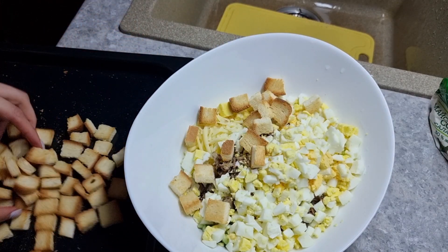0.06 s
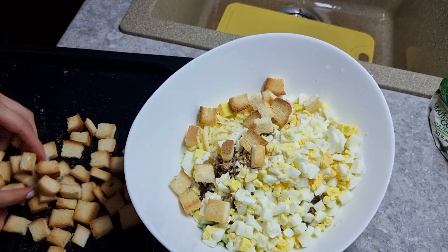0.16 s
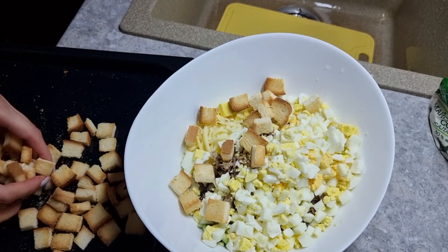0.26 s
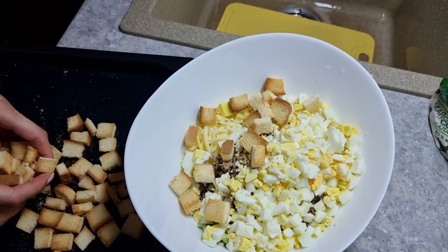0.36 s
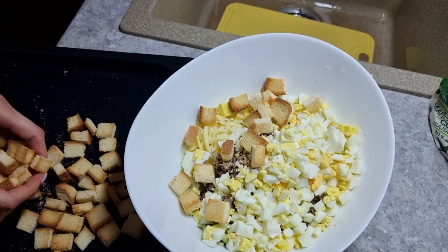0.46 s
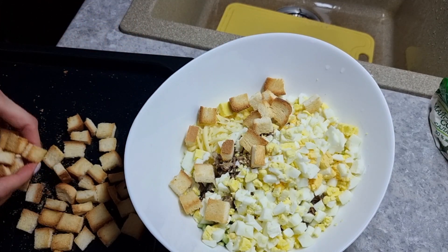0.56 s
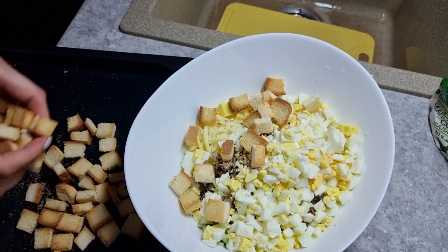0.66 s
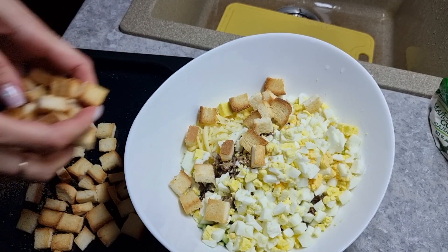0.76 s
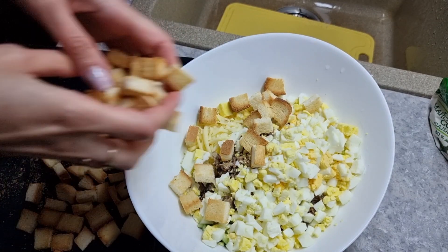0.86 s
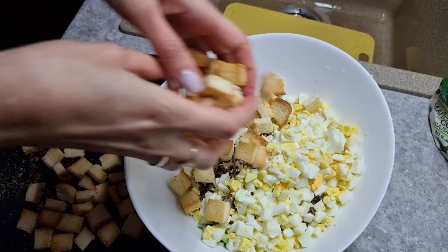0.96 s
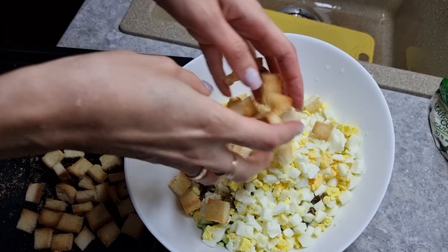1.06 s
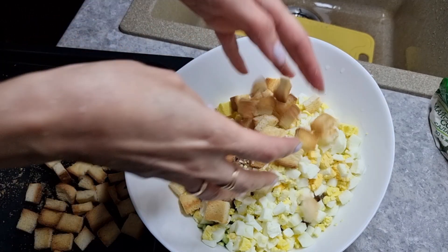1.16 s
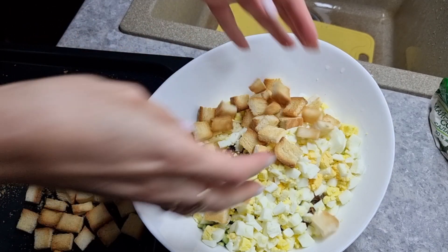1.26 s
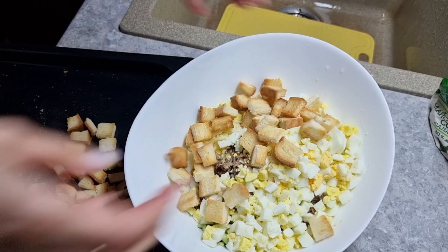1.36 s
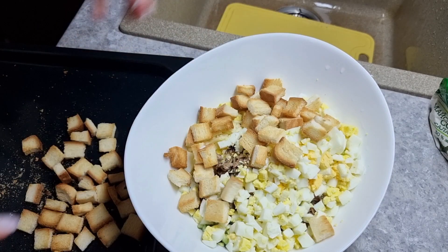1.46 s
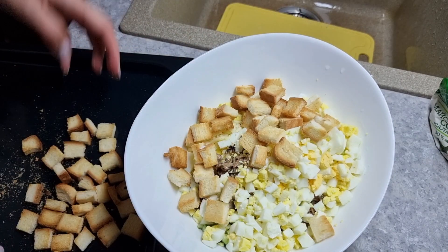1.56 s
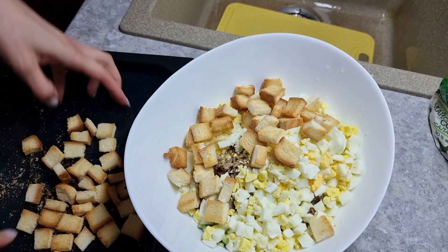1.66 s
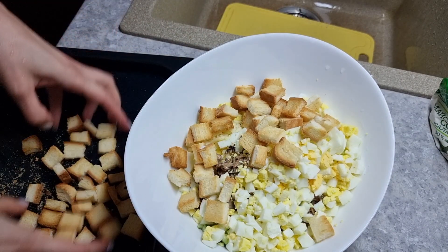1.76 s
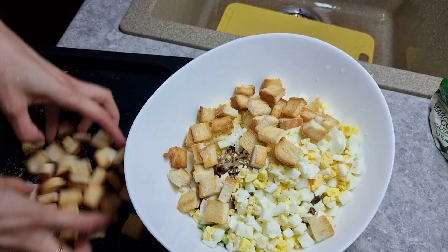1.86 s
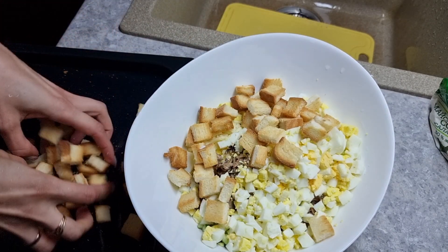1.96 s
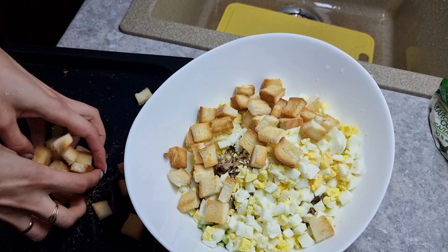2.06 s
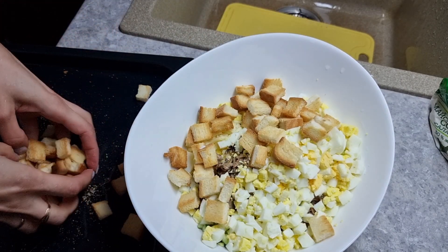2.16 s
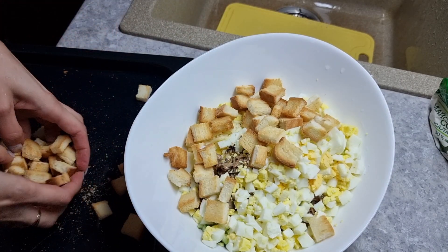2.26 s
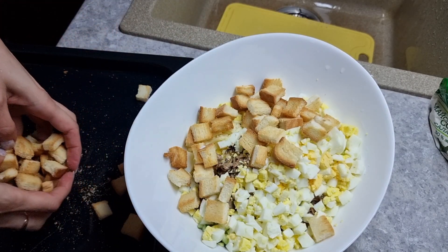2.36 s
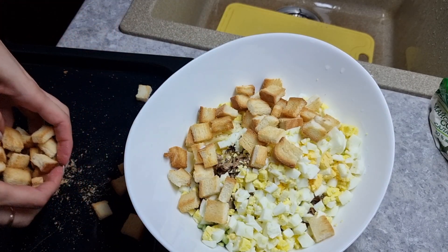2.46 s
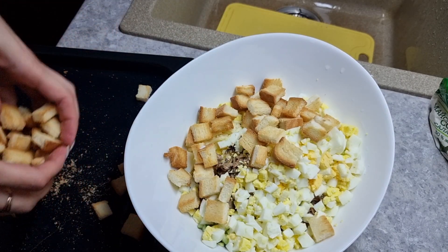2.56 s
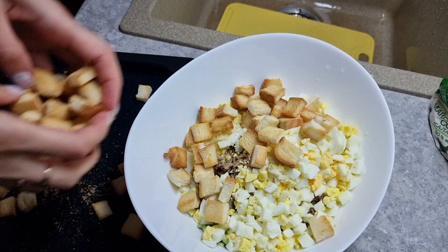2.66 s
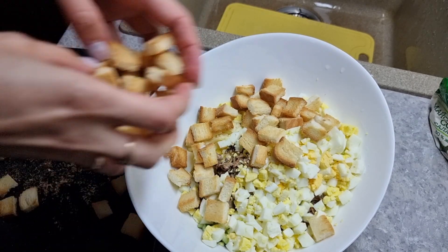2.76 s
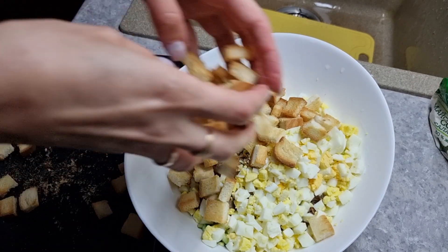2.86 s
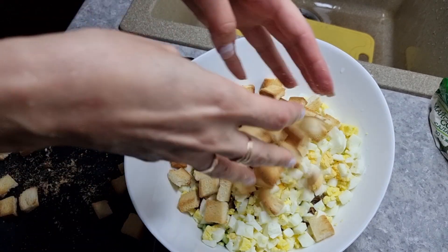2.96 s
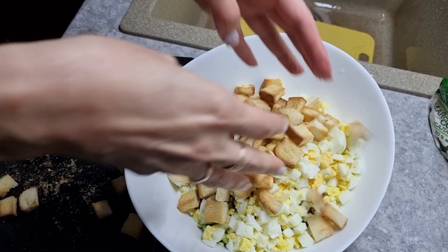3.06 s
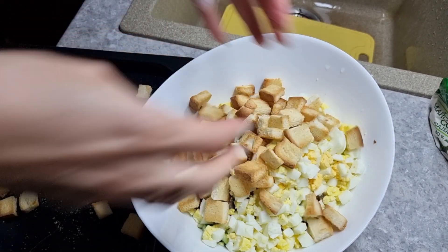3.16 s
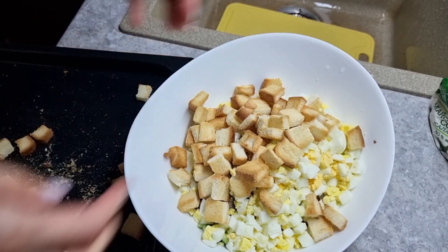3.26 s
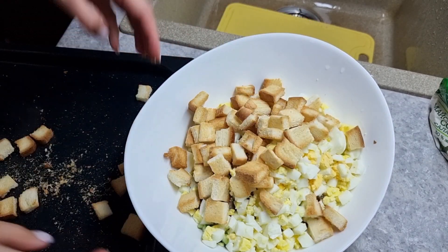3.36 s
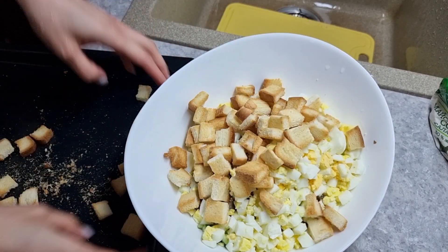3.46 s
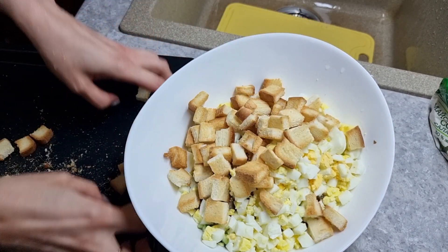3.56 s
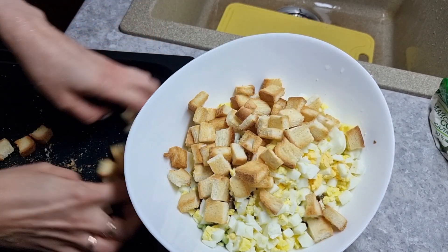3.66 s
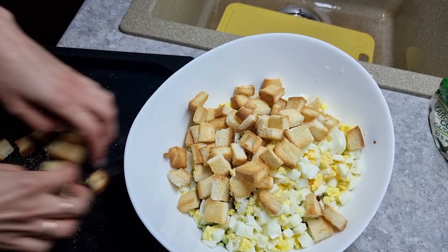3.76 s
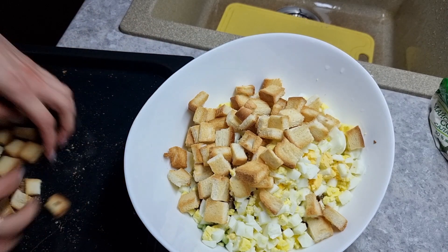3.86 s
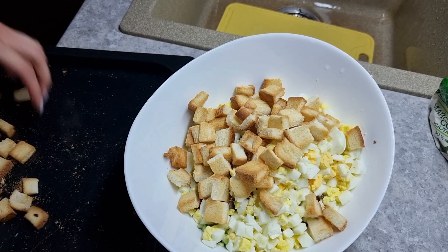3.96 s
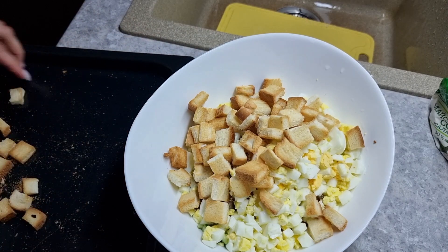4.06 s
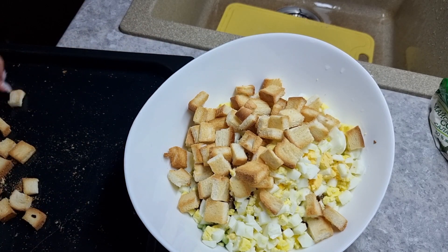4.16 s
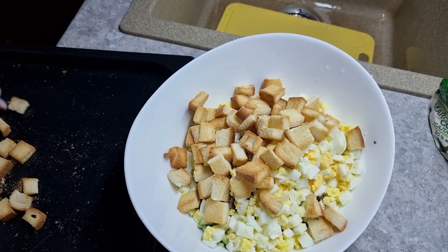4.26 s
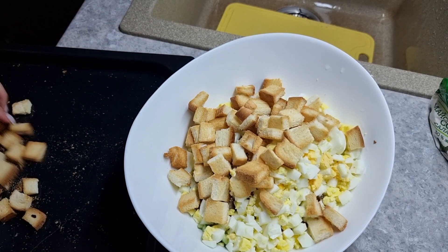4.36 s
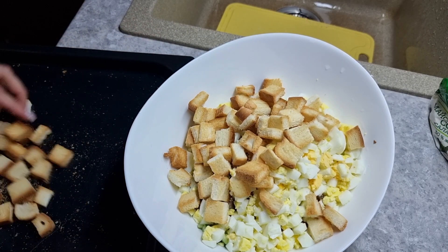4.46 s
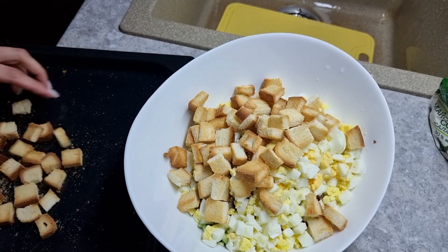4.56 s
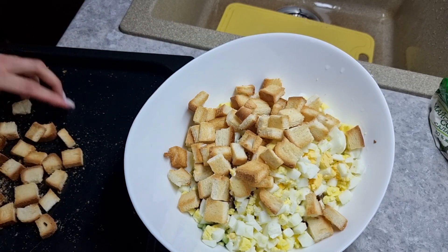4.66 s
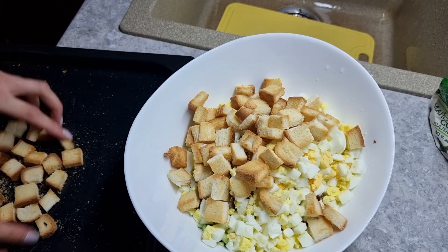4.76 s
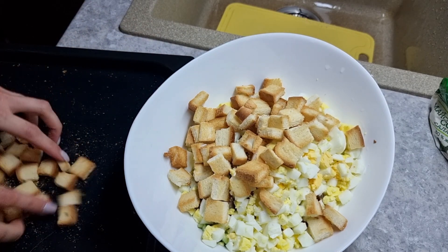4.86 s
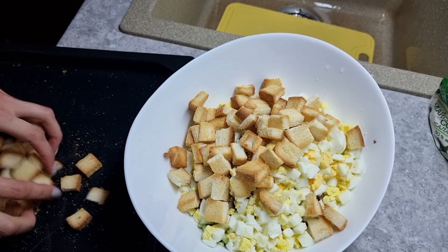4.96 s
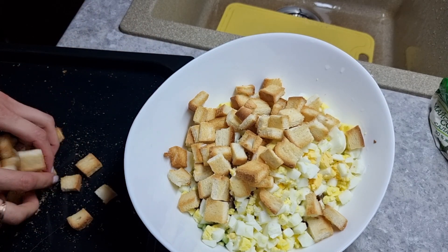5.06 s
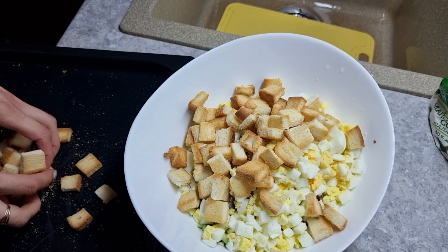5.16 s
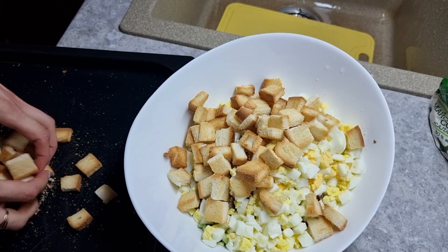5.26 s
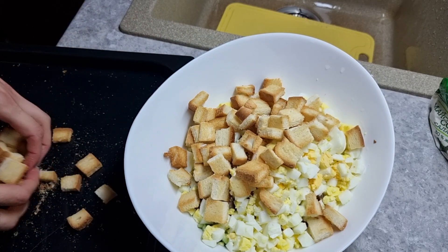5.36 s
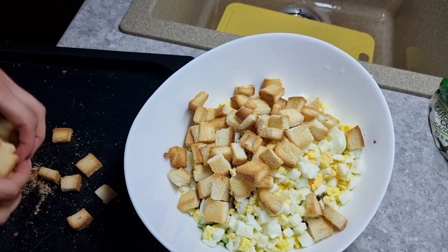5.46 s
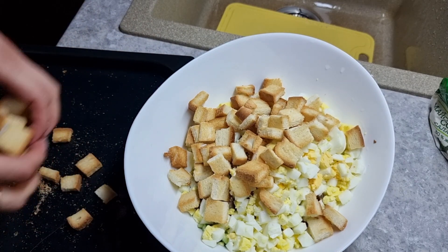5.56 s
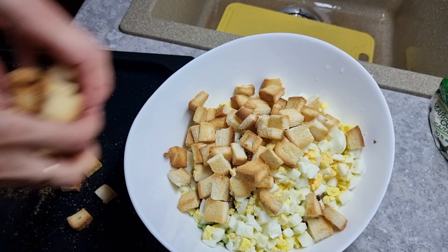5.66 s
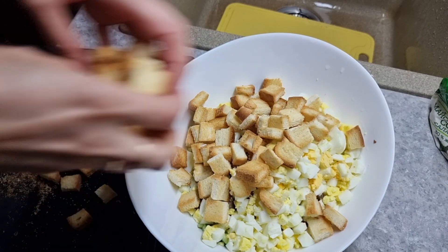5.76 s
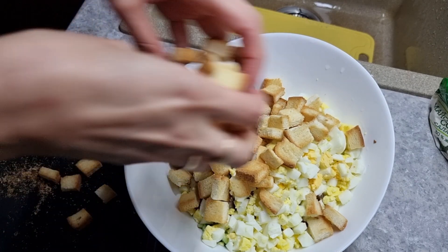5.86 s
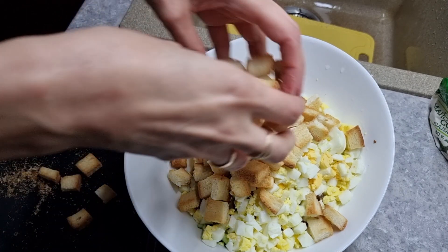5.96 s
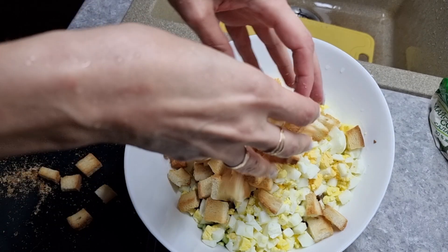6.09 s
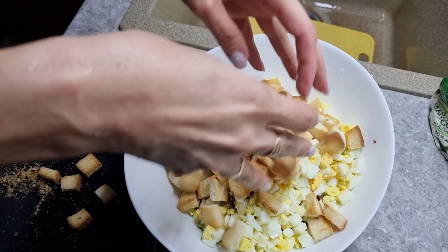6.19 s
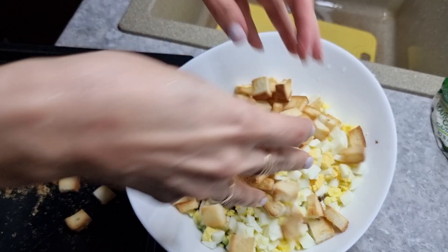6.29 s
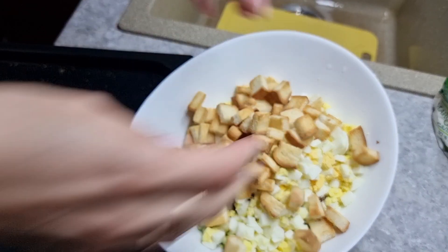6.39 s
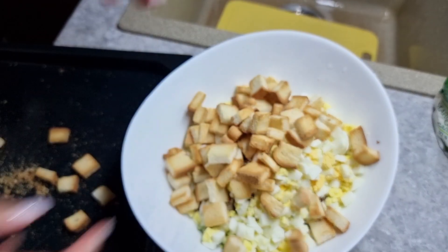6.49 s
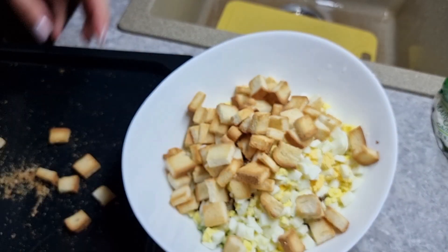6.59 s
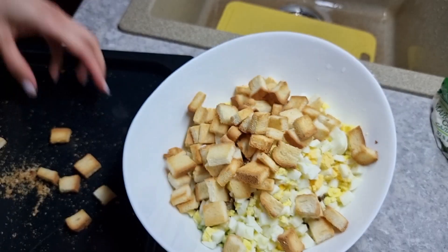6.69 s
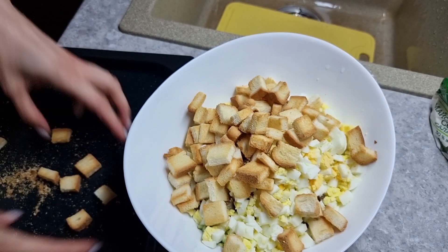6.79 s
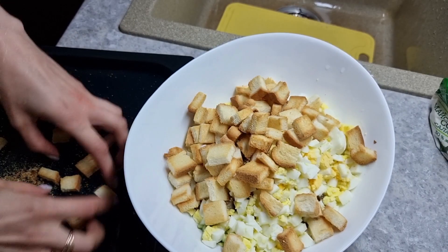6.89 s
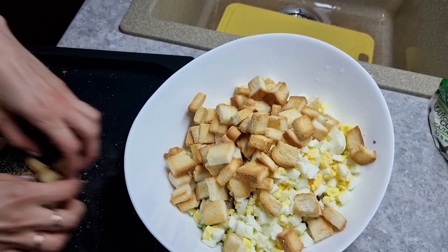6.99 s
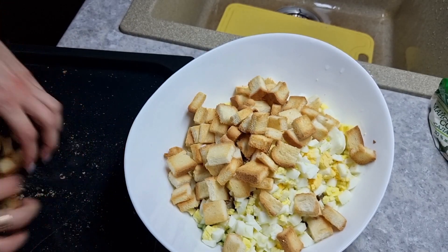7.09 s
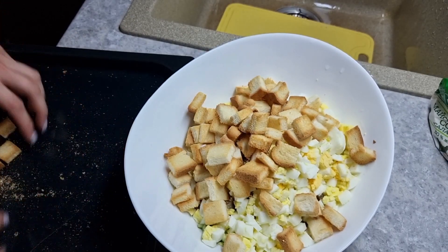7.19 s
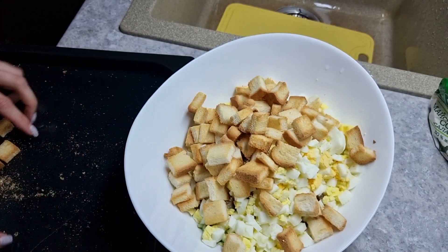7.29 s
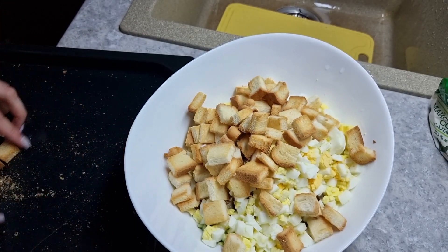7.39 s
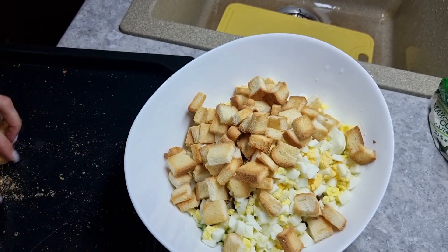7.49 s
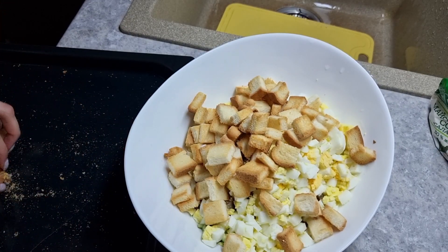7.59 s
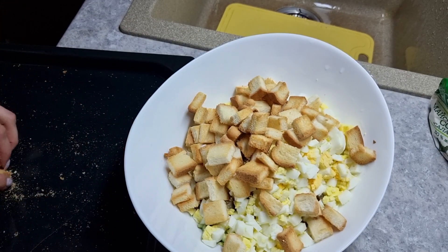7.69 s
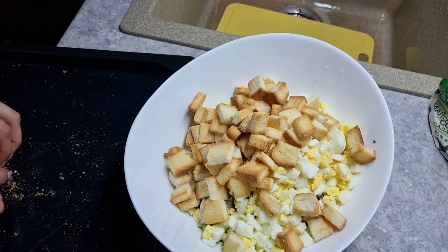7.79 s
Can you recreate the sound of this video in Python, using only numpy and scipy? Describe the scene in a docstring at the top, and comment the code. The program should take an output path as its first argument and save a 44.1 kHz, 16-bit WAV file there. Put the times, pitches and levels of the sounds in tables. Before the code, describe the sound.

Close stereo pickup of croutons being swept in short, gritty metallic strokes, with tinny knocks and crusty rasping. Each gathered handful gets a quieter moment, then tumbles in a brief dry clatter onto a soft pile; stray pieces ring a ceramic bowl delicately. The tray bumps and groans on the counter, with one strong clack late on. The room is small and fairly dry, with a quiet steady drone behind.

```python
"""Croutons from tray to salad.

Two hands sweep croutons over a metal tray: random slips and timed knocks excite noise and clear modes.
Three handfuls fall on a salad: noise clicks under pour envelopes. Some ping the china bowl: beating sines.
The tray clacks, groans and rumbles on the counter: noise answers to bumps, resonant noise for pushes.
Behind them a small kitchen: appliance drone, two low resonances and a faint rush of noise."""
import sys
import numpy as np
from scipy import signal
from scipy.io import wavfile
from scipy.ndimage import uniform_filter1d

SR = 44100
rng = np.random.default_rng(int(sys.argv[2]) if len(sys.argv) > 2 else 0)


def unload_wav(signal):
    """Save mono or channel-first audio to the path in sys.argv[1] as 16-bit WAV at rate SR, clipped to [-1, 1]."""
    wavfile.write(
        sys.argv[1],
        SR,
        np.round(np.clip(np.atleast_2d(signal).T, -1, 1) * 32767).astype(np.int16),
    )


N = 345239
TIME = np.arange(N) / SR
TAIL = TIME[:SR // 2]


# cubes and fingernails knocking on the tray: t/s, level/dB, first rebound/dB (near 0 clatter, far below single tap)
TRAY_KNOCKS = [(0.2152, -29.5, -3.5), (0.3, -23.5, -24), (0.329, -28.5, -1.5), (0.3589, -21, -3.5),
               (0.469, -35, -0.5), (1.62, -30, -0.5), (1.636, -26, -8), (1.876, -25, 1.5),
               (2.081, -17, -5.5), (2.122, -26.5, -2), (2.595, -38.5, 0), (2.649, -33.5, -3.5),
               (3.4737, -22, -5), (3.522, -27.5, -4), (3.5564, -34, 2), (3.632, -23, -6), (4.072, -33, -1),
               (4.1901, -24.5, -8), (4.2624, -27, -7), (4.452, -21, -1), (4.601, -32.5, -15),
               (4.99, -26.5, -10), (5.054, -25, -4), (5.199, -29, 0), (5.3812, -33, 0.5),
               (6.7579, -23, -1.5), (7.2533, -26.5, -3.5), (7.362, -42, 6)]
# rasp of crust on metal: f/Hz, level per Hz/dB
RASP_COLOUR = [(900, -8.5), (3000, 2.5), (7000, 0.5), (10500, -1), (15500, 1)]


def tray():
    """Cubes stick and slip over the sheet metal and knock on it; their crusts rasp at every contact."""
    scrape, rasp = np.array(sweeping()) * jerks(per_s=70, swing_db=4)
    # a catching edge sounds in metal and crust together
    catches = slips(per_s=140, spread_db=-1.0)
    metal_slips = slips(per_s=700, spread_db=2.0)
    crust_slips = slips(per_s=560, spread_db=3.0)
    scraping = scrape * (from_db(-2.5) * metal_slips + from_db(-4.5) * catches)
    rasping = rasp * (crust_slips + from_db(0.5) * catches)

    knocks = np.array(TRAY_KNOCKS)
    knocking = blows(knocks[:, :2], gain_db=22.0, settle_s=0.011, rebound_db=knocks[:, 2],
                     count=4, graze_db=-15.5)

    metal = play(scraping, lambda: tray_spot(t60_s=0.04, room_db=-4.5, modes_db=6.5), count=7)
    metal += play(knocking, lambda: tray_spot(t60_s=0.06, room_db=-2, modes_db=6), count=4)
    crust_touches = rasping + from_db(-19) * knocking
    crust = play(crust_touches, lambda: body(RASP_COLOUR, t60_s=0.0023, room_db=2.0, uneven_db=3.5), count=8)
    return panned(metal, left_db=1.0) + panned(crust, left_db=-1.5)


# hands pushing cubes over the tray: t/s, length/s, scrape level/dB, rasp level/dB
STROKES = [(-0.04, 0.28, -26, -39.5), (0.443, 0.028, -35, -42.5), (1.645, 0.35, -43, -65),
           (1.749, 0.19, -27, -39.5), (1.936, 0.087, -32.5, -47), (2.072, 0.093, -34.5, -43.5),
           (2.584, 0.0087, -34, -86), (3.529, 0.11, -39.5, -56), (3.621, 0.2, -34, -46.5),
           (3.817, 0.14, -44, -74), (4.075, 0.25, -45.5, -72), (4.235, 0.16, -23, -40),
           (4.445, 0.075, -33.5, -56), (4.56, 0.44, -36, -50), (4.782, 0.17, -28, -38),
           (5.01, 0.14, -32.5, -46), (5.094, 0.019, -26.5, -36.5), (5.27, 0.13, -47, -54.5),
           (6.854, 0.12, -34, -48), (7.052, 0.52, -41.5, -54.5), (7.49, 0.16, -34, -42),
           (7.683, 0.17, -42, -46)]
# crusts creaking in the cupped hands: t/s, length/s, rasp level/dB
CUPPINGS = [(2.303, 0.49, -60), (5.473, 0.6, -67)]


def sweeping():
    """How hard the cubes scrape the metal, and how hard their crusts rasp, pushed or cupped."""
    scrape = together(from_db(db) * gesture(s, length_s) for s, length_s, db, _ in STROKES)
    pushed = together(from_db(db) * gesture(s, length_s) for s, length_s, _, db in STROKES)
    cupped = together(from_db(db) * gesture(s, length_s) for s, length_s, db in CUPPINGS)
    return scrape, together([pushed, cupped])


# dense modes of the tray: f/Hz, level per Hz/dB
TRAY_COLOUR = [(150, -12), (330, 1), (600, -2.5), (850, -2), (1150, 2.5), (1400, -5.5), (1750, -1),
               (2200, 5), (3200, 3), (4600, -6), (7000, -7.5), (11000, -35), (16000, -22)]
# clearest modes of the tray: f/Hz, level/dB, t60/s
TRAY_MODES = [(669, -18, 0.017), (1132, -14, 0.035), (1617, -9.5, 0.1), (1695, -12.5, 0.02),
              (1823, -7, 0.018), (2722, -17.5, 0.085)]


def tray_spot(t60_s, room_db, modes_db, detune=0.013):
    """The tray touched at one spot: clear modes, shifted a little by the load, ring over the dense ones."""
    phases = rng.uniform(0, 2 * np.pi, (len(TRAY_MODES), 1)) + [0, 2]  # right leads by 2 rad
    shifts = 1 + detune * rng.uniform(-1, 1, len(TRAY_MODES))
    modes = 0
    for (hz, db, ring_s), phase, shift in zip(TRAY_MODES, phases, shifts):
        tone = np.sin(2 * np.pi * hz * shift * TAIL + phase[:, None])
        modes = modes + from_db(db) * unit(dying(ring_s) * tone)
    return unit(body(TRAY_COLOUR, t60_s, room_db, uneven_db=2.5) + from_db(modes_db) * modes)


# crust clicking on crust: t/s, level/dB
CLICKS = [(0.9418, -31), (1.0221, -25.5), (1.036, -36), (1.0465, -26), (1.072, -30), (1.085, -30),
          (1.1007, -26.5), (1.1704, -29), (1.1795, -27), (1.2234, -23.5), (1.35, -27.5), (1.378, -32),
          (2.4443, -40), (2.8624, -32), (2.8953, -27), (2.932, -24), (2.96, -27), (2.9921, -30.5),
          (3.0243, -24), (3.0764, -28.5), (3.1805, -34), (5.1244, -17), (5.915, -27.5), (5.9782, -26.5),
          (6.032, -27), (6.057, -25), (6.114, -32), (6.1572, -26.5), (6.211, -36), (6.2474, -31.5),
          (6.5742, -49)]
# dry cubes: f/Hz, level per Hz/dB
CUBE_COLOUR = [(300, -7.5), (520, -10), (780, 1.5), (1200, 4), (2000, -0.5), (3000, 2), (7000, 1.5),
               (10500, -4), (15500, -3)]


def handfuls():
    """Light porous cubes click on each other, each with its own colour; the soft salad stops them."""
    tumbling = from_db(-1.5) * pouring() * slips(per_s=480, spread_db=3.5)
    landing = blows(CLICKS, gain_db=17.0, settle_s=0.007, rebound_db=-4, count=4)

    def cube():
        return body(CUBE_COLOUR, t60_s=0.0099, room_db=-4.5, uneven_db=2.5, centred=0.18)

    return panned(play(tumbling + landing, cube, count=8), left_db=-2.0)


# handfuls let go over the salad: t/s, fall/s, rattle level/dB, time until the last cube settles/s
HANDFULS = [(1.03, 0.073, -42, 0.37), (2.9, 0.056, -31.5, 0.22), (6.025, 0.069, -34.5, 0.27)]
POUR_ATTACK_S, POUR_RELEASE_DB_PER_S = 0.008, 362
LOOSEN_S, LOOSEN_DB, SETTLE_DB = 0.11, -55, -46.5  # fingers part before the fall; stragglers outlast it


def pouring():
    """A handful loosens, falls all at once, and its stragglers settle."""
    stages = []
    for s, fall_s, db, settle_s in HANDFULS:
        stages += [(s - LOOSEN_S, LOOSEN_S, LOOSEN_DB), (s, fall_s, db), (s, settle_s, SETTLE_DB)]
    return together(from_db(db) * gesture(s, length_s, POUR_ATTACK_S, POUR_RELEASE_DB_PER_S)
                    for s, length_s, db in stages)


# cubes hitting the china: t/s, level/dB of each main mode from low to high (set by the spot struck)
BOWL_PINGS = [(1.222, -43, -40, -33, -35, -29.5), (1.298, -43, -51, -47, -39, -45),
              (1.349, -48, -41, -44, -55, -44), (3.023, -42, -45, -34, -40, -42),
              (3.084, -39, -46, -48, -46, -43), (3.106, -41, -40, -50, -49, -43),
              (3.229, -58, -55, -45, -52, -55), (6.282, -58, -58, -52, -61, -64),
              (6.375, -46, -43, -35, -45, -43)]
# main modes of the bowl: f/Hz, t60/s
BOWL_MODES = [(1220, 0.48), (1870, 0.4), (2630, 0.32), (3490, 0.33), (4452, 0.25)]
# weaker modes of the bowl: f/Hz, level re highest main mode/dB, t60/s
BOWL_OVERTONES = [(5400, -9, 0.13)]
# the bowl is oval: each mode beats with a weaker twin, split by one to two times this
TWIN_MIN_SPLIT_HZ, TWIN_DB = 6.6, -10


def bowl(far_side_rad=1.93, swell_s=0.00019):
    """A cube on the bare china sets it ringing, with another mix of its beating modes at every spot."""
    out = np.zeros((2, N + len(TAIL)))
    swell = 1 - np.exp(-TAIL / swell_s)  # each ring fades in over a fraction of a millisecond
    for s, *levels_db in BOWL_PINGS:
        start = int(s * SR)
        modes = [(hz, db, t60_s) for (hz, t60_s), db in zip(BOWL_MODES, levels_db)]
        modes += [(hz, levels_db[-1] + db, t60_s) for hz, db, t60_s in BOWL_OVERTONES]
        for hz, db, t60_s in modes:
            # the rim bulges on one side as it sinks on the other: left and right out of step
            phase = 2 * np.pi * hz * TAIL + rng.uniform(0, 2 * np.pi) + np.array([[0], [far_side_rad]])
            beat = 2 * np.pi * TWIN_MIN_SPLIT_HZ * (1 + rng.random((2, 1))) * TAIL
            ring = np.sin(phase) + from_db(TWIN_DB) * np.sin(phase + beat)
            decay = np.exp(-np.log(1000) * TAIL / t60_s)
            out[:, start:start + len(TAIL)] += from_db(db) * swell * decay * ring
    return panned(out[:, :N], left_db=-2.0)


# the tray bumping on the counter: t/s, level/dB
BUMPS = [(0.218, -26), (1.636, -22), (3.68, -24), (4.667, -32.5), (6.875, -23.5), (6.887, -21),
         (6.895, -15)]
# clack of a bump: f/Hz, level per Hz/dB
BUMP_COLOUR = [(200, -7.5), (480, -11.5), (730, 4), (900, 1.5), (1150, -1.5), (1450, -6.5), (1900, -2.5),
               (3000, -8), (6000, -26.5)]
# hands bearing down on the tray floor: t/s, length/s, level/dB
PRESSES = [(0, 0.71, -51.5), (.205, 0.085, -38.5), (4.269, 0.37, -49), (4.665, 0.035, -41),
           (4.81, 0.086, -43.5), (4.86, 0.45, -47), (7.462, 0.37, -48)]
# groan of the floor: f/Hz, Q, level/dB
FLOOR_MODES = [(168.8, 10, -0.5), (296, 0.37, -1.5)]
# the whole tray shoved along the counter: t/s, length/s, level/dB
SHOVES = [(3.516, 0.21, -51.5), (4.19, 0.28, -48), (6.867, 0.24, -48.5)]
# rumble of a shove: f/Hz, Q, level/dB
RUMBLE_MODES = [(42, 1.5, -11.5), (83.7, 6.3, 3.5)]


def tray_on_counter():
    """The pushed tray clacks and rumbles on the counter, and its floor groans where the hands press."""
    bumping = blows(BUMPS, gain_db=22.0, settle_s=0.013, rebound_db=-24.5, count=3)
    clacks = play(bumping, lambda: body(BUMP_COLOUR, t60_s=0.04, room_db=-3, uneven_db=1.5), count=2)
    floor = panned(groan(PRESSES, FLOOR_MODES), left_db=-6.0)
    rumble = panned(groan(SHOVES, RUMBLE_MODES), left_db=-2.5)
    return clacks + floor + rumble


def groan(pushes, modes):
    """Friction under pushes that rise fast and ease off, heard through low resonances of the tray."""
    force = together(from_db(db) * np.sin(np.pi * np.sqrt(np.clip((TIME - s) / length_s, 0, 1)))
                     for s, length_s, db in pushes)
    return resonating(force, modes) * np.sqrt(2 * np.sum(force ** 2))


# rush of air: f/Hz, level per Hz/dB
RUSH_COLOUR = [(30, -34), (80, -6), (140, -3.5), (240, -13.5), (330, -15), (500, -19), (1300, -24),
               (4400, -36), (14000, -45)]
# low resonances the appliance keeps humming: f/Hz, Q, level/dB
HUM_MODES = [(55.5, 4, -10.5), (169.4, 7.5, -0.5)]


def kitchen_hum(mains_hz=50):
    """An appliance drones at twice the mains rate and hums in two low resonances over a faint rush of air."""
    rush = from_db(-54.0) * np.sqrt(N) * coloured(np.ones(N), RUSH_COLOUR, uneven_db=-2)
    hum = from_db(-56.5) * np.sqrt(N) * resonating(1, HUM_MODES)
    drone = from_db(-53.0) * np.sin(2 * np.pi * 2 * mains_hz * TIME)
    return panned(rush + hum + drone, left_db=-3.5)


def gesture(start_s, length_s, attack_s=0.026, release_db_per_s=153):
    """Gain of one hand movement: swells, holds, then dies away as the cubes come to rest."""
    since_s = TIME - start_s
    return np.clip(since_s / attack_s, 0, 1) * from_db(-release_db_per_s * np.clip(since_s - length_s, 0, 1))


def together(gains):
    """Overlapping movements add in power."""
    return np.sqrt(sum(gain ** 2 for gain in gains))


def jerks(per_s, swing_db):
    """A heap moves in fits and starts: an uneven gain of mean power one."""
    turns_s = np.cumsum(rng.exponential(1 / per_s, size=2000))
    gain = from_db(np.interp(TIME, turns_s, swing_db * rng.uniform(-1, 1, len(turns_s))))
    return unit(gain) * np.sqrt(N)


def slips(per_s, spread_db):
    """Random tiny contacts of uneven strength, levelled towards a steady mean power of one."""
    sizes = from_db(spread_db * np.minimum(rng.exponential(1, N), 3.2)) * rng.choice([-1, 1], N)
    touches = sizes * (rng.random(N) < per_s / SR)
    power = uniform_filter1d(touches ** 2, size=SR // 16)
    return touches / np.sqrt(np.maximum(power, per_s / SR))


def blows(events, gain_db, settle_s, rebound_db, count, graze_db=-17):
    """Each blow is a light graze, the main touch, and rebounds as the piece tips onto its edges."""
    out = np.zeros(N)
    order = np.arange(-1, count)  # -1 graze, 0 main touch, then rebounds
    rebounds_db = np.broadcast_to(rebound_db, len(events))
    chances = rng.random((len(events), 2, count + 1))
    for (s, db), rebound, chance in zip(events, rebounds_db, chances):
        strength_db = np.where(order < 0, graze_db, rebound * np.sqrt(np.abs(order)))
        delays_s = settle_s * (order - chance[0] * (order != 0)) / count
        sizes = from_db(db + gain_db + strength_db) * np.sign(chance[1] - 0.5)
        np.add.at(out, np.clip(((s + delays_s) * SR).astype(int), 0, N - 1), sizes)
    return out


def play(touches, answer, count, changes_per_s=70):
    """One spot or piece after another takes over the contact, each with an answer of its own."""
    turn = np.cumsum(rng.random(N) < changes_per_s / SR)
    dealt = rng.integers(0, count, N)[turn]
    out = 0
    for k in range(count):
        own_touches = touches * (dealt == k)
        out = out + signal.oaconvolve(own_touches[None], answer(), axes=1)[:, :N]
    return out


KITCHEN_T60_S = 0.27


def body(colour, t60_s, room_db, uneven_db, centred=0):
    """Answer to one touch: a crowd of quickly dying modes as coloured noise, then the kitchen."""
    envelope = np.hypot(dying(t60_s), from_db(room_db) * dying(KITCHEN_T60_S))
    return coloured(envelope, colour, uneven_db, centred)


# stereo width: f/Hz, left-right likeness (1 same, 0 unrelated, -1 opposed)
LIKENESS = [(170, 0.95), (500, -0.85), (1300, -0.072), (2200, -0.082), (6000, 0.00036)]


def coloured(envelope, colour, uneven_db, centred=0):
    """Stereo noise under an envelope, in third-octave bands of slightly uneven strength; unit energy."""
    edges = 22 * 2 ** (np.arange(30) / 3)
    white = rng.standard_normal((2, 2, len(envelope))) * envelope
    chances = rng.standard_normal(len(edges))
    out = 0
    for k, (low, high, chance) in enumerate(zip(edges, edges[1:], chances)):
        hz = np.sqrt(low * high)
        if hz < colour[0][0]:
            continue
        band_pass = signal.butter(2, [low, high], "band", fs=SR, output="sos")
        mid, side = signal.sosfilt(band_pass, white[k % 2] + 1e-18)
        # a source straight ahead reaches both sides alike
        alike = np.clip(centred + (1 - centred) * at_hz(LIKENESS, hz), -1, 1)
        band = np.sqrt(1 + alike) * unit(mid) + np.sqrt(1 - alike) * unit(side) * [[1], [-1]]
        out = out + band * np.sqrt(high - low) * from_db(at_hz(colour, hz) + uneven_db * chance)
    return unit(out)


def resonating(force, modes):
    """Noise under a force through low resonances, each of unit energy before its own level."""
    out = 0
    for hz, q, db in modes:
        b, a = signal.iirpeak(hz, q, fs=SR)
        noise = force * rng.standard_normal(N) + 1e-18
        ringing = signal.lfilter(b, a, signal.lfilter(b, a, noise))
        out = out + from_db(db) * unit(ringing)
    return out


def from_db(db):
    """Decibels to gain."""
    return 10 ** (np.asarray(db) / 20)


def unit(x):
    """Scale to a mean energy of one per channel."""
    return x / np.sqrt(np.mean(np.sum(x ** 2, axis=-1)) + 1e-20)


def dying(t60_s):
    """A decay of unit energy."""
    return unit(np.exp(-np.log(1000) * TAIL / t60_s))


def at_hz(points, hz):
    """Read a table on a log-frequency axis."""
    freqs_hz, values = np.transpose(points)
    return np.interp(np.log(hz), np.log(freqs_hz), values)


def panned(x, left_db):
    """Lean a sound to the left (negative: right)."""
    return x * from_db([[left_db / 2], [-left_db / 2]])


def scene():
    """Tray, falling cubes and bowl over the hum of the kitchen."""
    return tray() + handfuls() + bowl() + tray_on_counter() + kitchen_hum()


CUTOFF_HZ = 15900


def record(dry):
    """The top is cut steeply."""
    low_pass = signal.ellip(12, 0.2, 80, CUTOFF_HZ, fs=SR, output="sos")  # ripple/dB, stopband/dB
    return signal.sosfilt(low_pass, dry)


dry = scene()
out = record(dry)
unload_wav(out)
```